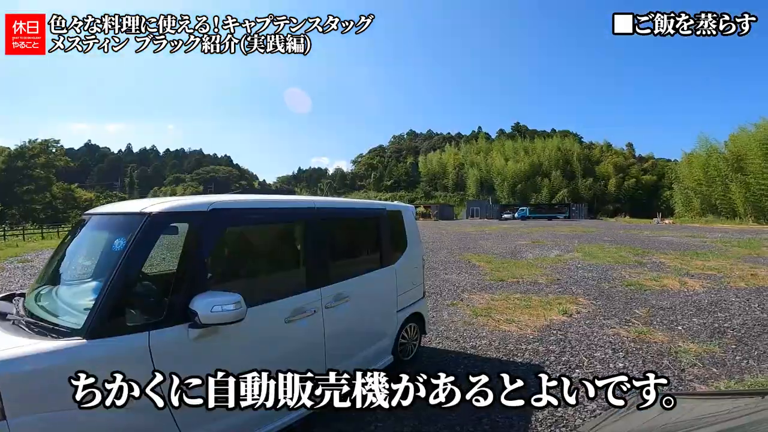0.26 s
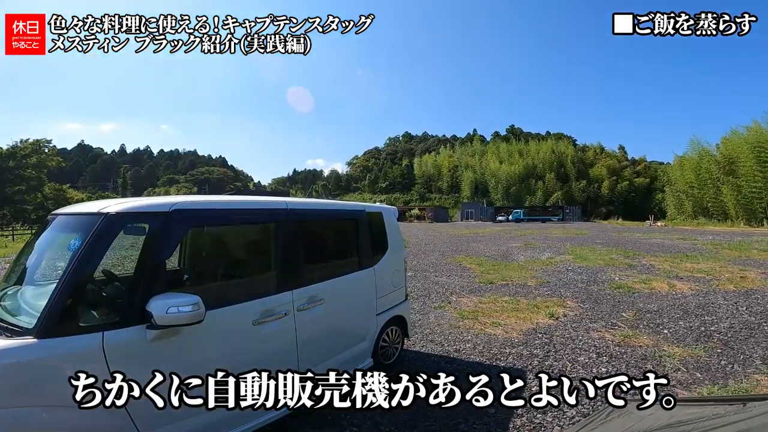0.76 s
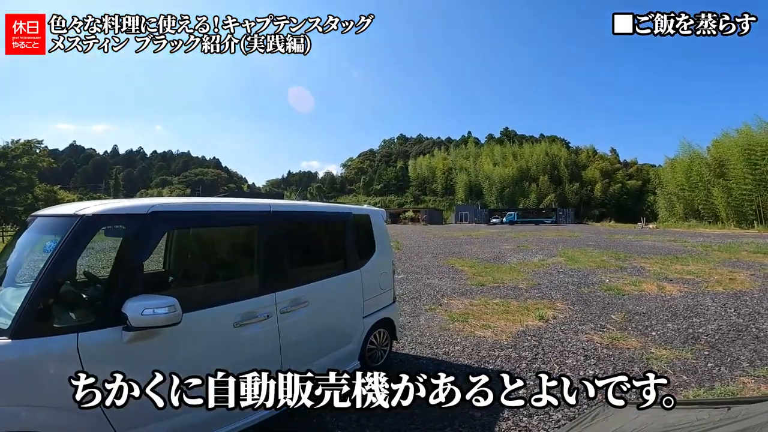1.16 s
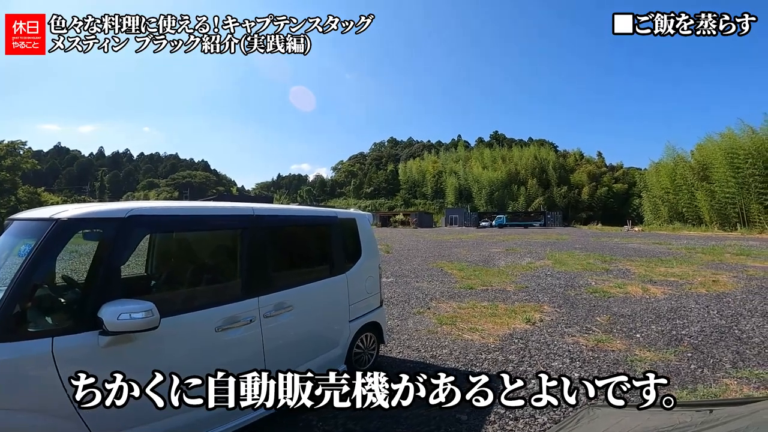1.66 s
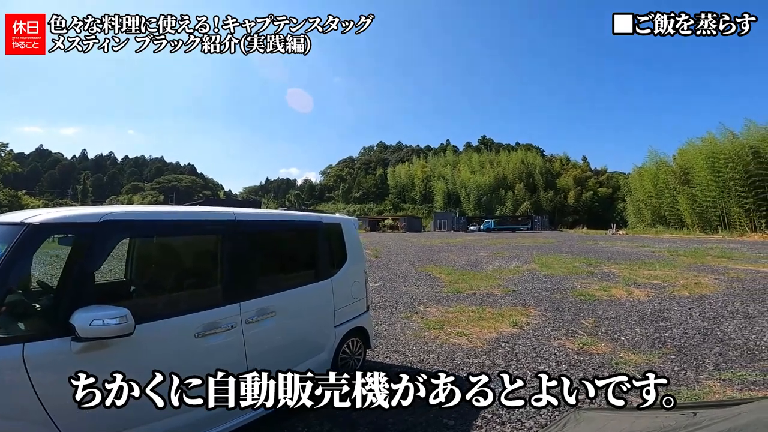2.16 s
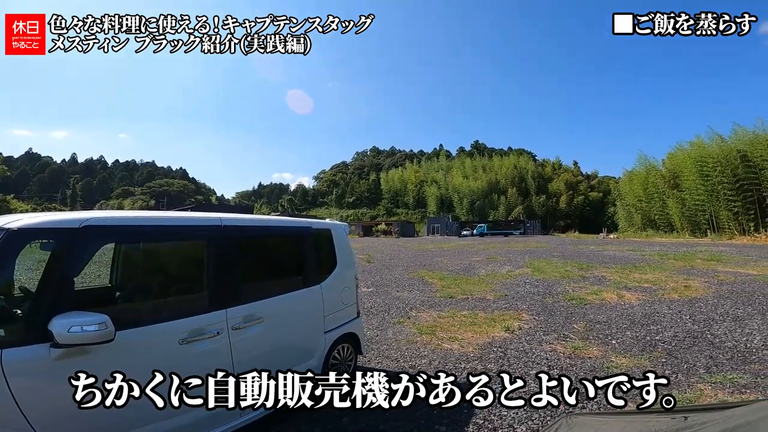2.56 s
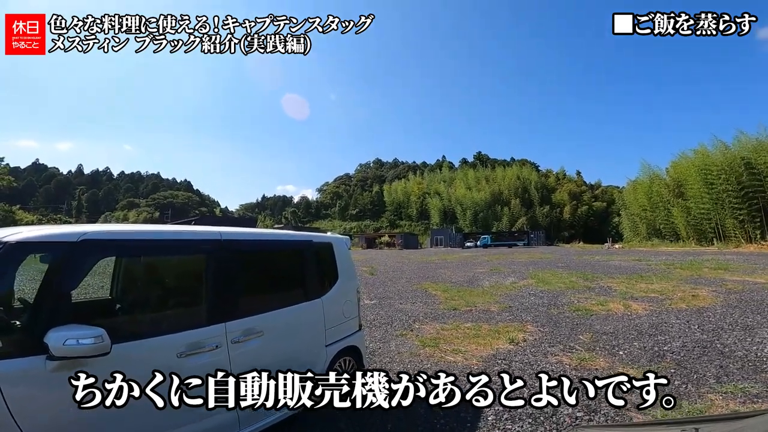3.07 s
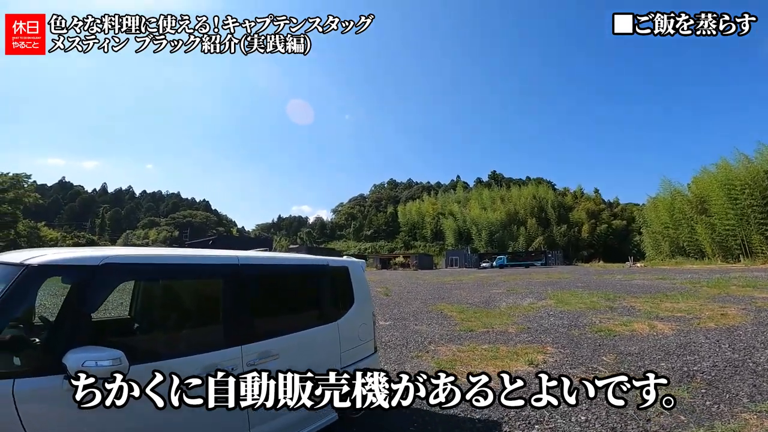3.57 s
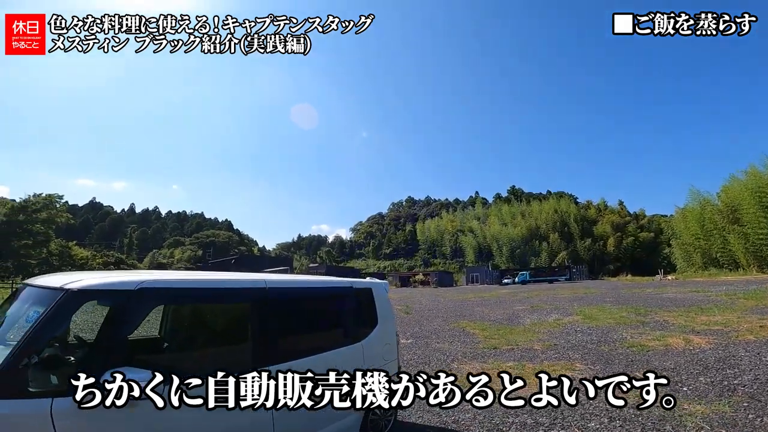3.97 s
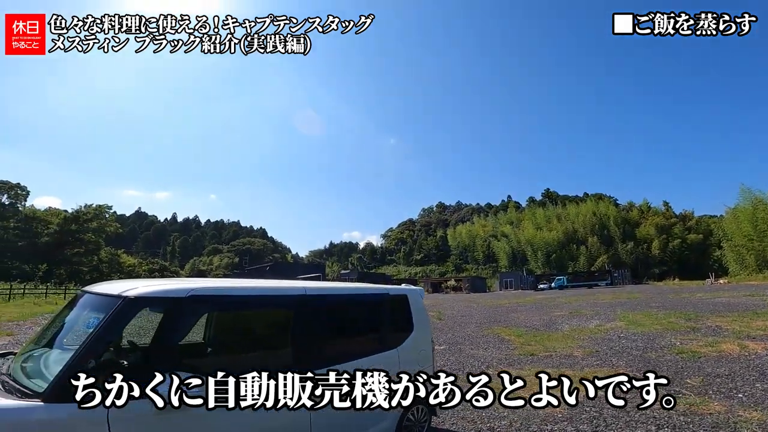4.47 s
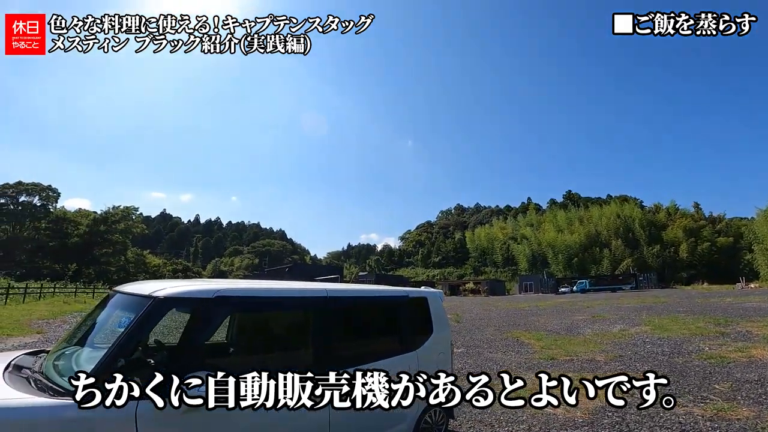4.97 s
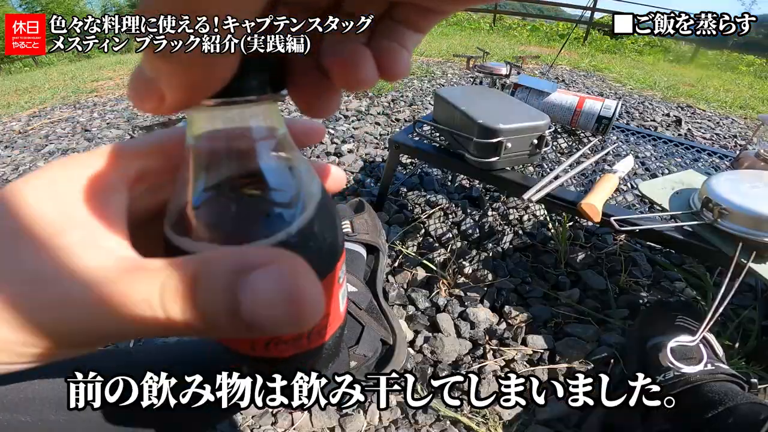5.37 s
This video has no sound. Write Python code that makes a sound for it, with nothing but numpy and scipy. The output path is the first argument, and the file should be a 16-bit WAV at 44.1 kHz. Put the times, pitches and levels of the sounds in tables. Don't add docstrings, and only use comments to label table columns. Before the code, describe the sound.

A brief burst of cicada drone cuts to silence, then a long stretch outdoors at a wooded gravel lot: wind thumps and a busy clatter of dulled stones first, then sparser steps, thin bird whistles and throbbing cicadas over a distant motor. It stops dead, then a short windy ending with far fewer insects. Small camera microphones, narrow at first, gradually widening.

```python
import sys
import numpy as np
from scipy import signal
from scipy.io import wavfile
from scipy.ndimage import uniform_filter1d

SR = 44100
rng = np.random.default_rng(int(sys.argv[2]) if len(sys.argv) > 2 else 0)


def elevation(decibels):
    levels = np.asarray(decibels, float)
    return 10 ** (levels / 20)


def master_out(mix):
    frames = np.transpose(np.atleast_2d(mix))
    ceiling = np.clip(frames, -1, 1)
    pcm = np.round(ceiling * 32767).astype(np.int16)
    wavfile.write(sys.argv[1], SR, pcm)


N = 248283
T = np.arange(N) / SR

# start_s, end_s, fade_in_s, fade_out_s
STRETCHES = [
    (0, .198, .001, .0015),
    (.392, 5.181, .065, .0015),
    (5.372, 5.63, .085, .006),
]

# spectra are pitch_hz, level_db (per Hz)
ROAD_SPECTRUM = [(250, -32.5), (450, -12), (700, -5), (880, -6), (1010, 1.5), (1150, -4), (1400, -7),
                 (1900, -13.5), (2600, -37.5)]
LEAF_SPECTRUM = [(1200, -35), (2000, -1), (2900, 0), (4000, -2), (5000, 4), (8500, -5), (10000, -36)]
RUMBLE_SPECTRUM = [(90, -30), (140, -4.5), (200, 1.5), (280, -7), (420, -12), (650, -19)]
# multiple_of_hum, level_db
MOTOR_PARTIALS = [(2, -65), (3, -59.5), (4, -68.5), (5, -73), (6, -76.5), (7, -80.5), (8, -83.5)]
MOTOR_HZ = 53.05
MOTOR_HUM_DB = [-5.5, -2, 7.5]
# motor_and_rumble_db, upper_partials_db, road_db, leaves_db
DISTANT_LEVELS = [(-0.5, 15.5, -62, -66), (-2, 3.5, -61, -67), (7.5, 6.5, -51.5, -64.5)]
# peak_s, half_length_s, lift_db
CARS = [
    (2.3, 0.54, 3),
    (4.15, 0.38, 3.5),
]
STIR_S, STIR_HALF_S = 0.59, 0.49
STIR_LOW_DB, STIR_MOTOR_DB, STIR_ROAD_DB, STIR_LEAVES_DB = 4.5, 7.5, 8.5, 5.5

# spectra are pitch_hz, level_db (per Hz)
THUMP_SPECTRUM = [(15, -3.5), (27, -3), (42, -5), (58, -12.5), (80, -29.5), (110, -44.5)]
FLUTTER_SPECTRUM = [(45, -40), (62, 0.5), (100, -6), (140, -2.5), (230, -11.5), (400, -27.5), (700, -36)]
# peak_s, half_length_s, thump_db, flutter_db (against the thump)
GUSTS = [(.0, 0.048, -53.5, 2.5), (0.187, .04, -64.5, 7.5), (0.429, 0.012, -44, 4.5),
         (0.49, 0.048, -37, -10.5), (0.68, 0.087, -36, -12.5), (0.853, .1, -46, -8.5),
         (0.984, 0.05, -39.5, -7.5), (1.17, 0.078, -45, -8), (1.333, 0.079, -46.5, -5),
         (1.5, .06, -56, -16), (1.927, 0.18, -58.5, -18), (2.196, 0.041, -65, -8), (2.365, .04, -77, -1),
         (2.587, 0.075, -57.5, -12), (2.883, 0.044, -64, -4), (3.038, 0.019, -51.5, -6),
         (3.208, 0.09, -63, -1), (3.53, 0.15, -60, 1), (3.768, 0.063, -49, -11.5),
         (4.05, 0.19, -55.5, -5.5), (4.463, 0.15, -58.5, -2.5), (4.7, 0.026, -61, -20),
         (4.966, 0.07, -52, -12.5), (5.12, 0.3, -49.5, -9.5), (5.46, 0.19, -46, 7.5),
         (5.567, 0.069, -43.5, 0.5), (5.62, 0.042, -39, 4)]
CALM_THUMP_DB, CALM_FLUTTER_DB = -73, -70

# start_s, length_s, start_hz, end_hz, level_db
CHIRPS = [(2.94, .065, 4600, 4240, -62), (3.382, .024, 4400, 3930, -65), (3.57, 0.024, 4200, 3750, -65),
          (3.648, 0.027, 4200, 3600, -60.5), (3.827, 0.04, 4550, 4250, -63), (4.127, 0.2, 3530, 3570, -74),
          (4.39, .11, 3600, 3720, -75), (4.58, 0.055, 4040, 3470, -67), (4.768, 0.062, 4080, 3340, -67),
          (5.0, 0.035, 4450, 4260, -59.5), (5.138, .022, 4480, 4300, -61),
          (5.157, 0.026, 3790, 3120, -64.5)]
# start_s, length_s, start_hz, middle_hz, end_hz
BENT_NOTES = [
    (3.174, .032, 4450, 3850, 3740),
    (3.337, .048, 5050, 4440, 4800),
    (3.67, .034, 3650, 3850, 3620),
]
BENT_DB = -60
HALFWAY_FALL = 0.46

# start_s, peak_db, ring_hz, tick_db (against the ring)
STONES = [(0.497, -53, 1080, -30), (0.571, -40, 649, -26), (0.599, -36, 735, -25), (.503, -42, 1100, -20),
          (.508, -42, 1550, -15), (.521, -42, 1150, -20), (.672, -42, 1300, -12), (0.69, -36, 980, -19),
          (.7015, -32, 720, -18), (.788, -36, 850, -20), (.882, -48, 1150, -20), (.9255, -39, 1150, -10),
          (.928, -33, 1310, -14), (.9325, -41, 1000, -12), (.956, -46, 1200, -15), (1.104, -44, 1700, -15),
          (1.163, -43, 980, -30), (1.268, -42, 900, -20), (0.808, -48, 988, -15.5), (0.923, -44, 850, -16),
          (0.949, -37, 930, -40), (1.087, -44, 1240, -13), (1.098, -55, 1180, -14), (1.191, -37, 740, -22),
          (1.2605, -35, 1040, -36), (1.2615, -39, 543, -40), (1.841, -48, 1250, -2),
          (1.907, -35.5, 1300, -25), (1.9095, -43, 850, -30), (1.914, -48, 1750, -20),
          (2.132, -48, 1400, -8), (2.154, -52, 990, -20), (2.305, -47, 1300, -15), (2.404, -52, 2400, -5),
          (3.179, -44, 780, -20), (3.614, -43.5, 1040, -15), (2.1275, -49, 2700, -6),
          (2.545, -45, 840, -18), (2.932, -49, 2600, -20), (3.151, -40, 960, -16), (3.251, -45, 856, -13),
          (3.271, -48, 1700, 5), (3.2715, -54, 3400, -20), (3.362, -31, 900, -40), (3.469, -52, 710, -10),
          (3.927, -34, 1520, -40), (3.928, -39, 850, -30), (3.9315, -41, 950, -14), (3.96, -44, 1120, -15),
          (3.974, -45, 500, 1), (3.981, -42, 1100, -8), (4.014, -41, 1030, -21.5)]
# start_s, peak_db, ring_hz, tick_db,
# t60_s
KNOCKS = [(0.7322, -21, 866, -4, 0.0053), (.7357, -23.5, 1300, -19, 0.0041), (.734, -29, 230, -39.5, 0.022),
          (3.368, -43.5, 1400, -30, 0.0064), (2.137, -52, 2600, -10, .005), (0.7373, -16, 770, -12, 0.006),
          (.7335, -30, 540, -40, .015), (0.7432, -35.5, 1600, -14, 0.008), (.6795, -38.5, 870, -12, .035),
          (0.64, -44.5, 710, -30, 0.037), (.7805, -37, 910, -21, 0.015), (.7372, -40, 708, -41, .03),
          (.7372, -40, 980, -40, .025), (.748, -44, 800, -12, .008), (0.9179, -26.5, 980, -20, 0.0054),
          (2.3185, -40.5, 990, -9, 0.0093), (2.317, -46.5, 3550, -30, 0.013), (5.6085, -20, 70, -60, 0.13),
          (5.598, -25, 88, -60, 0.088), (5.577, -27, 34, -62, 0.14)]
# start_s, length_s, level_db
SCUFFS = [(0.489, 0.039, -48.5), (0.652, 0.1, -45), (0.729, 0.02, -38), (0.916, 0.024, -44.5),
          (0.942, 0.012, -46.5), (1.085, 0.033, -52), (1.904, 0.071, -52.5), (2.114, 0.041, -53.5),
          (2.298, 0.051, -53.5), (3.128, 0.047, -50.5), (3.165, 0.08, -51.5), (3.241, 0.081, -50.5),
          (3.438, 0.065, -55), (3.93, 0.072, -50.5)]
RING_CYCLES = 5.56

# spectra are pitch_hz, level_db (per Hz)
LOW_SPECTRUM = [(3800, -16.5), (4700, -9), (5000, -5), (5800, -1.5), (6600, -2.5), (7200, -4), (8200, -26),
                (10500, -31), (12400, -39.5), (13200, -59), (15700, -62)]
HIGH_SPECTRUM = [(5800, -28.5), (6700, -3), (7400, 2), (8500, 3.5), (9300, -6.5), (10200, -21),
                 (11000, -25.5)]
OVERTONE_SPECTRUM = [(10300, -29), (11500, -13.5), (12300, -12.5), (13500, -7), (15000, -11.5),
                     (15700, -10)]
# low_singers_db, high_singers_db, overtone_singers_db
CHOIR_LEVELS = [(-51, -52, -77), (-51.5, -52, -71), (-66, -61.5, -125)]
# time_s, lift_db
FACING = [(0, 0.5), (.5, 0.5), (1.1, 3.5), (1.45, 1), (3.2, -1), (3.6, 3.5), (3.9, 5.5), (5.2, 8),
          (5.3, -3.5)]
FACING_TOP, FACING_LOW = 0.42, 0.18
# time_s, pitch_hz, level_db (against the high choir)
LATE_SINGER = [(0, 7250, -23), (3, 7320, -34), (3.6, 7340, -22), (4.3, 7520, -9), (4.7, 7350, -6.5),
               (5.18, 7420, -2.5), (5.3, 7750, -19)]
# pitch_hz, width_hz, level_db
RIBS = [(4920, 90, -64), (5325, 100, -60), (5715, 120, -60), (6120, 120, -66)]
# time_s, throb_count
THROB_COUNT = [(.6, 3.78), (1.95, 25.51), (2.1, 27.67), (3.45, 49.23), (3.9, 57.26), (5.1, 76.63)]
# peak_s, half_length_s, depth_0_to_1
PHRASES = [(.85, .15, 0.2), (1.28, 0.072, 0.25), (1.65, 0.1, 0.16), (2.55, .1, 0.33), (3.0, 0.18, 0.54),
           (3.98, 0.12, 0.35), (4.55, 0.14, 0.46), (5.1, 0.22, 0.1)]
# offset_in_click_rates, level_db
SHRILL_LINES = [(-4, -10), (-3, -6), (-2, -9), (-1, -9), (0, 0), (1, -1), (2, -6), (3, -9)]
CLICK_HZ, SHRILL_HZ = 396.5, 14176
# peak_s, half_length_s, effort_0_to_1
BUZZER_SWELLS = [(1.65, .1, 0.2), (1.95, .13, 0.77), (2.72, .15, .8), (3.3, .12, .25), (3.88, .12, 0.7),
                 (4.7, 0.1, 0.8), (5.1, .1, 0.2)]
REST_THROB, REST_BUZZ, SWELL_BUZZ, SWELL_DB = .08, .3, .8, 4.5
SCREEN_DB = -17.5

START_WIDTHS = [(.56, .005, .005), (.78, .005, .01), (0.931, .005, .1)]
# start_s, end_s, final_width_0_to_1, ease_in_power
OPENINGS = [(0.7, 4.7, 0.87, 2.3), (2.71, 4.04, 0.98, 1.1), (1.05, 1.33, 1, 1.0)]
# peak_s, half_length_s, width_0_to_1
LULLS = [(.46, .025, 0.06), (.6, 0.022, 0.08), (1.1, 0.077, 0.24), (1.49, 0.037, 0.17), (1.75, 0.094, 0.07),
         (2.4, 0.031, .1)]
LULL_SHARES = [1, 0.78, .3]


def evened(x):
    return x / np.sqrt(np.mean(x ** 2) + 1e-20)


def columns(rows):
    s, *cols = np.transpose(rows)
    return [np.interp(T, s, c) for c in cols]


def add(mix, s, sound):
    part = mix[round(s * SR):][:len(sound)]
    part += sound[:len(part)]


def by_stretch(values):
    return np.asarray(values)[np.searchsorted([.3, 5.28], T)]


def bumps(rows):
    return sum(height * np.exp(-((T - s) / half) ** 2) for s, half, height in rows)


def ramp(start, end):
    return np.clip((T - start) / (end - start), 0, 1) * by_stretch([0, 1, 0])


def stirring():
    return bumps([(STIR_S, STIR_HALF_S, 1)]) * by_stretch([0, 1, 0])


def wander(hz):
    return evened(signal.lfilter(*signal.butter(2, hz / (SR / 2)), rng.standard_normal(N)))


def resonate(x, hz, width):
    turn = np.exp(2j * np.pi * np.cumsum(hz * np.ones(len(x))) / SR)
    r = np.exp(-np.pi * width / SR)
    return 2 * (turn * signal.lfilter([1 - r], [1, -r], x / turn)).real


def ringing_noise(hz, width):
    return evened(resonate(resonate(rng.standard_normal(N), hz, width), hz, width))


def cloud(spectrum, band, same, pan_db, patchy_db, size=1024):
    frames, hz = 2 * N // size + 3, np.fft.rfftfreq(size, 1 / SR)
    a, b, c, d, patches = rng.standard_normal((frames, len(hz), 5), dtype=np.float32).T
    patches = uniform_filter1d(uniform_filter1d(patches, size=3, axis=0), size=5, axis=1)
    f, db = np.transpose(spectrum)
    curve_db = np.interp(np.log(hz + 1), np.log(f), db, left=-90, right=-90)[:, None]
    shape = elevation(curve_db + patchy_db * evened(patches))
    same = np.clip(same, -1, 1)
    left = a + 1j * b
    right = same * left + np.sqrt(1 - same ** 2) * (c + 1j * d)
    z = np.array([left * elevation(pan_db / 2), right / elevation(pan_db / 2)]) * shape
    power = abs(z.mean(0)) ** 2
    out = signal.istft(z, window="cosine", nperseg=size, noverlap=size // 2)[1][:, :N]
    inside = power[(hz >= band[0]) & (hz < band[1])].sum() / power.sum()
    return out / np.sqrt(np.mean(out.mean(0) ** 2) * inside)


def road_wash():
    level_db = by_stretch(DISTANT_LEVELS)[:, 2] + STIR_ROAD_DB * stirring() + bumps(CARS)
    wash = cloud(ROAD_SPECTRUM, (600, 1500), same=0.78, pan_db=6.0, patchy_db=1.5)
    return elevation(level_db + 1.0 * wander(13.0)) * wash


def leaf_rustle():
    level_db = by_stretch(DISTANT_LEVELS)[:, 3] + STIR_LEAVES_DB * stirring()
    return elevation(level_db) * cloud(LEAF_SPECTRUM, (1800, 3600), same=0.76, pan_db=1.0, patchy_db=2.5)


def far_motor():
    motor_db, bright_db, _, _ = by_stretch(DISTANT_LEVELS).T
    turns = np.cumsum(MOTOR_HZ * (1 + 0.00299 * wander(1.76))) / SR
    hum = np.zeros(N)
    for k, db in MOTOR_PARTIALS:
        level = elevation(db + bright_db * (k > 3) + 1.8 * wander(5.4))
        hum += level * np.sqrt(2) * np.sin(2 * np.pi * (k * turns + rng.random()))
    rumble = cloud(RUMBLE_SPECTRUM, (135, 400), same=0.82, pan_db=3.0, patchy_db=3.5, size=4096)
    motor = elevation(by_stretch(MOTOR_HUM_DB)) * hum + elevation(-60.5) * rumble
    return elevation(motor_db + STIR_MOTOR_DB * stirring()) * motor


def wind():
    thump = elevation(CALM_THUMP_DB) + bumps([(s, half, elevation(db)) for s, half, db, _ in GUSTS])
    flutter = elevation(CALM_FLUTTER_DB) + bumps([(s, half, elevation(db + rel)) for s, half, db, rel in GUSTS])
    flutter = flutter * elevation(-2.0 + 1.7 * wander(34.0))
    deep = cloud(THUMP_SPECTRUM, (20, 60), same=.7, pan_db=1.3, patchy_db=.5, size=4096)
    rough = cloud(FLUTTER_SPECTRUM, (60, 135), same=0.96, pan_db=0.0, patchy_db=2.0, size=4096)
    return thump * deep + flutter * rough


def bird():
    out, quaver = np.zeros(N), 1 + .009 * wander(200.0)
    notes = [(s, length, a, a + HALFWAY_FALL * (b - a), b, db) for s, length, a, b, db in CHIRPS]
    notes += [(*row, BENT_DB) for row in BENT_NOTES]
    for s, length, *bend, db in notes:
        u = np.arange(0, 1, 1 / (length * SR))
        hz = np.polyval(np.polyfit([0, .5, 1], bend, deg=2), u)
        hz = hz * np.resize(quaver[round(s * SR):], len(u))
        whistle = np.sin(2 * np.pi * np.cumsum(hz) / SR) * signal.windows.tukey(len(u), .35)
        add(out, s, elevation(db + 7.0) * whistle)
    out *= elevation(2.8 * wander(160.0) - 2.5)
    near_echo = elevation(-15) * np.roll(out, round(.007 * SR))
    far_echo = elevation(-18) * np.roll(out, round(.019 * SR))
    return (out + near_echo + far_echo) * elevation([[1.5], [-1.5]])


def stone_knocks():
    out, t = np.zeros(N), np.arange(2500) / SR
    hits = [(*row, RING_CYCLES / row[2]) for row in STONES] + KNOCKS
    detuned = t * rng.uniform(.88, 1.15, (len(hits), 4, 1))
    for (s, db, hz, tick_db, t60), u in zip(hits, detuned):
        fade = elevation(-60 * t / max(t60, .004)) * (1 - np.exp(-t * hz / 0.31)) ** 2
        ring = np.sin(2 * np.pi * hz * t)
        ring += 0.15 * np.sin(2 * np.pi * 1.9 * hz * t)
        ring += 0.065 * np.sin(2 * np.pi * 0.76 * hz * t)
        tick = np.sin(2 * np.pi * 3500 * u[0]) + 0.5 * np.sin(2 * np.pi * 2600 * u[1])
        tick += .5 * np.sin(2 * np.pi * 1900 * u[2]) + 0.62 * np.sin(2 * np.pi * 4200 * u[3])
        tick *= elevation(tick_db - 60 * t / 0.0055) * (1 - np.exp(-t / 0.00026))
        add(out, s + 0.001007, elevation(db + 9.5) * (fade * ring + tick))
    return out


def grit_scuffs():
    snaps = elevation(2.4 * np.minimum(rng.exponential(1, N), 3)) * (rng.random(N) < 4000 / SR)
    grit = rng.standard_normal(N) * (0.12 + snaps)
    grit = evened(resonate(grit, 940, 1700) + 0.22 * resonate(grit, 3200, 1900))
    return grit * sum(elevation(db) * np.exp(-2 * ((T - s - length / 2) / (length / 2)) ** 2)
                      for s, length, db in SCUFFS)


def gravel():
    dulled = signal.lfilter(*signal.butter(4, 4400 / (SR / 2)), stone_knocks() + grit_scuffs())
    return dulled * elevation([[.7], [-.7]])


def low_choir(level_db, throb, beat):
    ribs = sum(elevation(db) * ringing_noise(hz, width) for hz, width, db in RIBS)
    choir = cloud(LOW_SPECTRUM, (4500, 6700), same=0.78, pan_db=1.5, patchy_db=2.5)
    choir = choir * np.sqrt(1 + 0.8 * throb * beat)
    near = elevation(50) * ribs * (.55 + 3.2 * throb * ((1 + beat) / 2) ** 3)
    return elevation(level_db - .6) * (choir + near)


def high_choir(level_db):
    late_hz, late_db = columns(LATE_SINGER)
    late = ringing_noise(late_hz, 600) * elevation(late_db + [[3.5], [-3.5]])
    choir = cloud(HIGH_SPECTRUM, (6700, 9500), same=0.9, pan_db=6.0, patchy_db=1.2)
    return elevation(level_db - 0.93) * (choir + late)


def overtone_choir(level_db, throb, beat, swell):
    buzz = REST_BUZZ + SWELL_BUZZ * swell
    turns = np.cumsum(430 * (1 + .004 * wander(3.0))) / SR
    fast = 1 + buzz * (.3 * np.cos(2 * np.pi * turns) + .25 * np.cos(np.pi * turns))
    choir = cloud(OVERTONE_SPECTRUM, (12500, 15600), same=.45, pan_db=8.5, patchy_db=2.0)
    choir = choir * fast * (1 - .25 * throb * beat)
    time = np.cumsum(1 + .0003 * wander(8.0)) / SR
    comb = sum(elevation(db) * np.sin(2 * np.pi * ((SHRILL_HZ + k * CLICK_HZ) * time + rng.random()))
               for k, db in SHRILL_LINES)
    shrill = evened(comb) * throb * np.clip(.6 - 1.5 * beat, 0, 1) * elevation([[5.5], [-9.5]])
    return elevation(level_db) * (choir + shrill)


def cicadas():
    low_db, high_db, top_db = by_stretch(CHOIR_LEVELS).T
    (throb_count,), (facing,) = columns(THROB_COUNT), columns(FACING)
    swell = bumps(BUZZER_SWELLS)
    throb = np.clip(REST_THROB + bumps(PHRASES), 0, .9)
    beat = np.cos(2 * np.pi * throb_count)
    low_db = low_db + STIR_LOW_DB * stirring() + FACING_LOW * facing
    screen = by_stretch([0, 1, 0]) - ramp(.9, 1.45)
    top_db = top_db + FACING_TOP * facing + SWELL_DB * swell + SCREEN_DB * screen
    low, high = low_choir(low_db, throb, beat), high_choir(high_db + facing)
    return low + high + overtone_choir(top_db, throb, beat, swell)


def scene():
    distance = road_wash() + leaf_rustle() + far_motor()
    return distance + wind() + bird() + gravel() + cicadas()


def low_pass(x):
    return signal.sosfilt(signal.butter(12, 15690, fs=SR, output="sos"), x)


def record(dry):
    mid, side = (dry[0] + dry[1]) / 2, (dry[0] - dry[1]) / 2
    low = signal.oaconvolve(side, signal.firwin(255, 2200, fs=SR), "same")
    below_top = signal.oaconvolve(side, signal.firwin(255, 11600, fs=SR), "same")
    bands = (low, below_top - low, side - below_top)
    lulls, side = bumps(LULLS), np.zeros(N)
    for band, shut, opening, share in zip(bands, START_WIDTHS, OPENINGS, LULL_SHARES):
        start, end, full, power = opening
        width = by_stretch(shut) + (full - shut[1]) * ramp(start, end) ** power + share * lulls
        side += np.clip(width, 0, 1.2) * band
    gate = sum(np.clip((T - start) / fade_in, 0, 1) ** 2.0 * np.clip((end - T) / fade_out, 0, 1)
               for start, end, fade_in, fade_out in STRETCHES)
    return low_pass(np.array([mid + side, mid - side]) * gate)


dry = scene()
out = record(dry)
master_out(out)
```